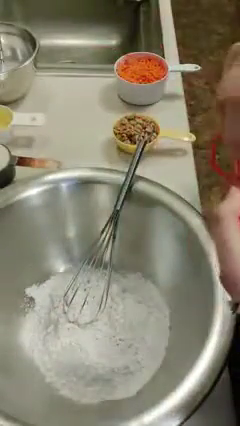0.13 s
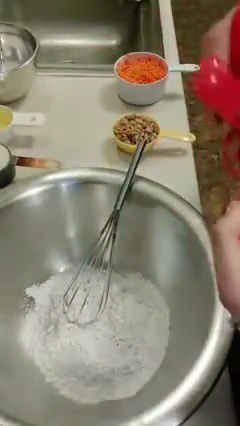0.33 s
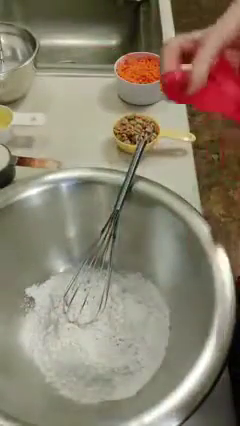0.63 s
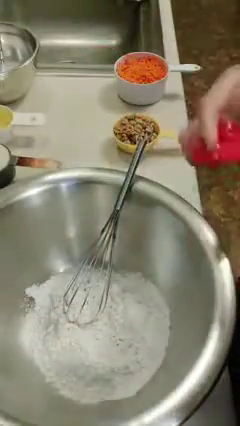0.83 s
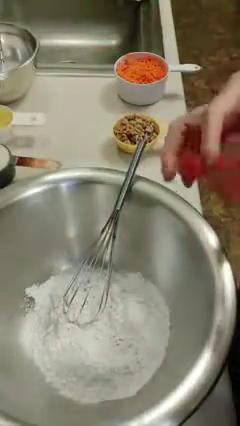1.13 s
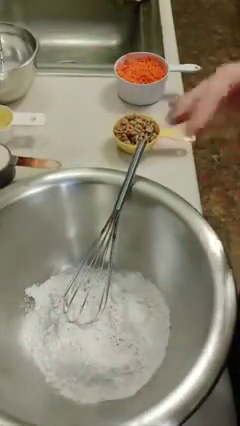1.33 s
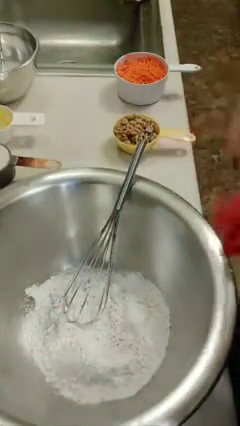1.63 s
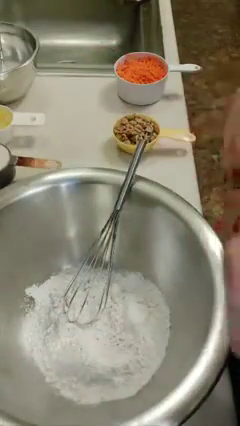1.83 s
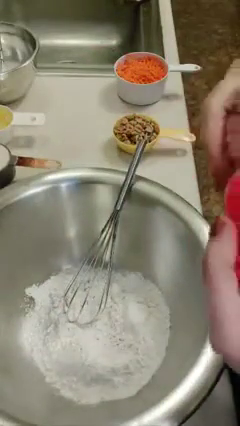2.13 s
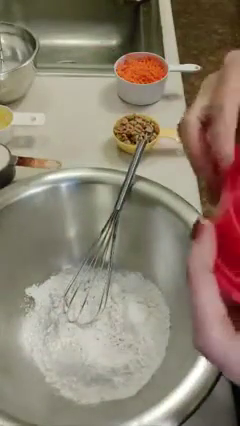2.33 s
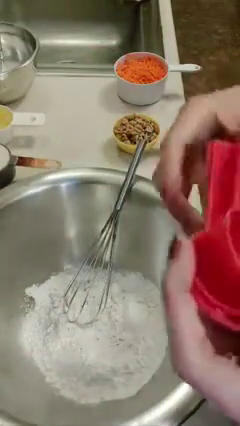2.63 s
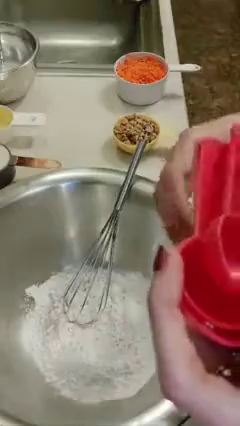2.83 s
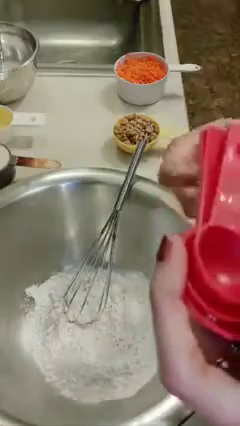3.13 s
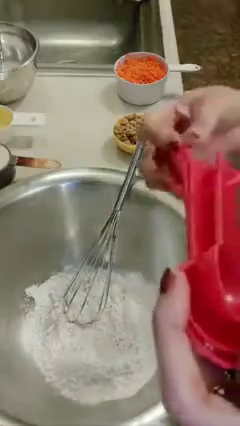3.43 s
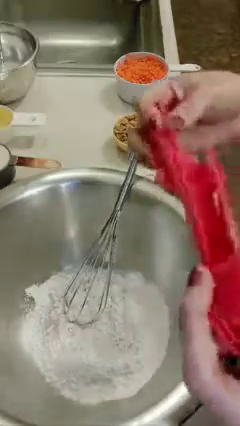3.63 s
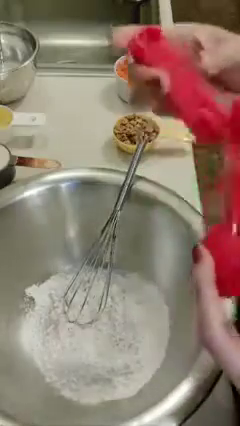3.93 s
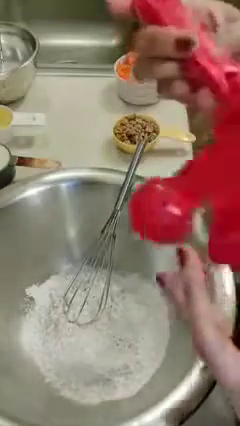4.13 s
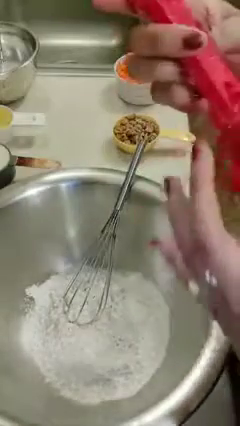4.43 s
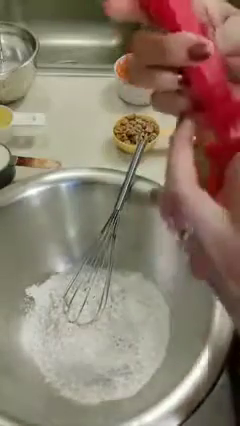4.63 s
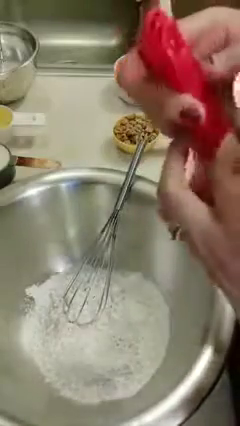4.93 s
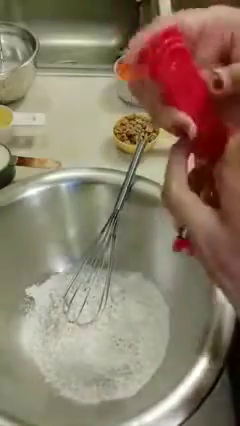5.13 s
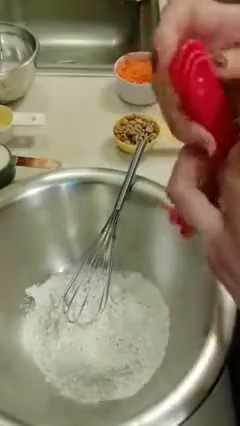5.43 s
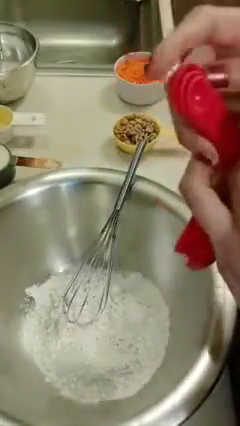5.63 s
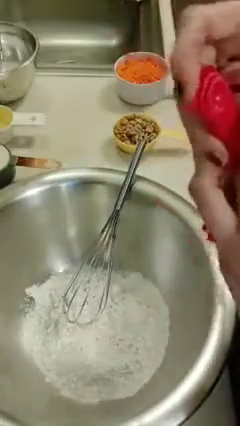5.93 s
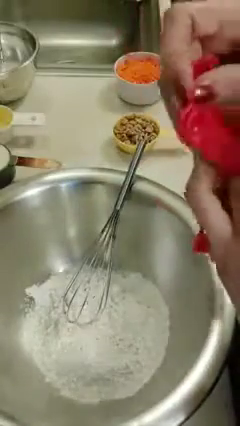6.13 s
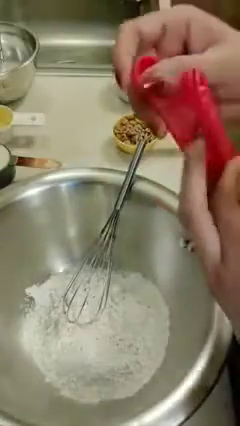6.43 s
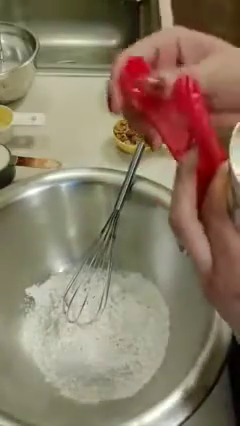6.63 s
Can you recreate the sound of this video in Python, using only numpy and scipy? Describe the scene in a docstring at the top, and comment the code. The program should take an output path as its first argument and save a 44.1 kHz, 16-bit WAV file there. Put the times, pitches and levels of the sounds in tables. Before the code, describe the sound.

A small kitchen with a quiet, steady refrigerator hum and soft low air, heard from close by. Right at the start, about 0.1 s, plastic measuring cups crack together loudly and brightly, followed by small clatters and scrapes until 0.6 s. Faint finger rubbing follows, then a light tock at 1.3 s and thin sliding. Around 1.75-1.8 s the cups land on the counter in a sharp, freer-ringing double clack. Only small ticks come until 3.0 s, when the gripped stack rattles in a tight, loud cluster, with further knocks at 3.3 and 3.6 s and short scrapes between. From 4.2 s loose spoons click and slide on their ring, with clearer clacks near 4.4, 4.7, 4.9 and 5.1 s. They thin to faint ticks and skin rubbing by 5.5-6 s, then sorted spoons clack again at 6.2-6.5 s. Knocks are dry, mostly leaning left, with a brief room tail.

```python
"""Plastic measuring cups and then a ring of plastic measuring spoons knock, clack and slide in the hands,
close to the microphone above a steel bowl. Each knock is a burst of tiny touches that sets decaying tones
ringing; sliding and fingertips send tiny slips or hiss through the same kind of tones.
A small kitchen rings briefly after them, a refrigerator hums in steady tones, and the air is shaped noise."""
import sys
import numpy as np
from scipy import signal
from scipy.fft import rfft, irfft, next_fast_len
from scipy.io import wavfile

SR = 44100
rng = np.random.default_rng(int(sys.argv[2]) if len(sys.argv) > 2 else 0)


def materialize(psi):
    """Save the field psi as 16-bit PCM at rate SR to the path in sys.argv[1].

    A 1-D psi becomes a single channel; in a 2-D psi each row is a channel.
    """
    bounded = np.clip(np.atleast_2d(psi).T, -1, 1)
    quanta = np.round(bounded * 32767).astype(np.int16)
    wavfile.write(sys.argv[1], SR, quanta)


N = 298998

# Refrigerator compressor, mains and fan tones: pitch_hz, level_db, left_over_right_db
REFRIGERATOR_TONES = [(46.9, -81, 16.5), (58.6, -78, 0.5), (67.3, -81.5, -2.5), (93.8, -69.5, -0.5),
                      (113, -68.5, -1), (119.7, -55.5, -2.5), (125.5, -69.5, 0), (351.4, -51, 17),
                      (494, -75, 7.5), (535, -80, -4), (586.6, -73, 1.5), (643, -87.5, 0.5),
                      (701, -74, -18)]
# Steady air noise, its balance over pitch: pitch_hz, density_db (relative, per Hz)
AIR_BALANCE = [(15, -44), (55, -8), (110, -11.5), (148, -0.5), (195, -16), (300, -8.5), (400, -16.5),
               (480, -17.5), (620, -22), (900, -33.5), (1500, -39.5), (2200, -47), (6000, -50),
               (11000, -53.5)]
# How alike the air noise is on both sides: pitch_hz, likeness (1 = the same)
AIR_LIKENESS = [(50, 1), (160, 0.93), (300, 0.9), (600, 0.68), (1500, 0.067), (8000, 0.078)]
# Side the air noise leans to: pitch_hz, left_over_right_db
AIR_LEAN = [(100, 2.5), (260, 2), (370, -2), (480, 3), (750, -2.5), (1200, 0.5)]
# Time the kitchen takes to fade by 60 dB: pitch_hz, fade_s
KITCHEN_FADE = [(800, 0.16), (2500, 0.29), (5500, 0.36), (10000, 0.28)]
# Strength of the kitchen's tail: pitch_hz, tail_db (relative to the sound sent into the room)
KITCHEN_STRENGTH = [(800, 6.5), (2500, -3.5), (5500, -5.5), (10000, -6.5)]
# Fingertips shifting their grip on the plastic: start_s, end_s, level_db
GRIPS = [(0.559, 0.894, -69.5), (1.126, 1.759, -79), (3.382, 4.21, -78.5), (4.153, 5.46, -75),
         (5.66, 5.878, -74.5)]
# Plastic sliding on plastic: start_s, end_s, level_db (relative), brightness_db_per_octave
SLIDES = [(0.084, 0.207, -55, -2), (0.376, 0.483, -51.5, -0.5), (0.512, 0.576, -63, 1.5),
          (1.143, 1.27, -76.5, 16.5), (1.259, 1.339, -53, -7.5), (1.411, 1.705, -59.5, -2),
          (1.707, 1.804, -51.5, 6), (2.024, 2.103, -66.5, 5.5), (2.46, 2.533, -73, -17.5),
          (2.69, 2.743, -60, -23.5), (2.935, 3.021, -59, 3.5), (3.041, 3.158, -56, 5),
          (3.233, 3.311, -56, -10), (3.35, 3.453, -57, -5), (3.453, 3.611, -65, 1.5),
          (3.642, 3.757, -62, -3), (3.784, 3.902, -61, -3), (4.148, 4.189, -65.5, -1.5),
          (4.201, 4.307, -61, -1), (4.294, 4.395, -56, -4.5), (4.452, 4.585, -72, 6),
          (4.628, 4.727, -60, -8), (4.762, 4.888, -54, -3), (4.937, 5.055, -68, 14),
          (5.221, 5.403, -61.5, 2), (6.358, 6.428, -57, -17.5)]
# Cups knocking together: start_s, level_db (relative), pitch_hz (strongest ring),
# focus_db_per_octave (low = broad crack, high = hollow tock), chatter_s, left_over_right_db
CUP_KNOCKS = [(0.0595, -38.5, 5800, 5.8, 0.0041, 3), (0.0722, -21.5, 5900, 11.5, 0.00053, 4),
              (0.0753, -20.5, 5800, 3.9, 0.0018, 15.5), (0.088, -31.5, 5800, 6.8, 0.0093, 6),
              (0.094, -44, 1290, 10.4, 0.003, -4.5), (0.109, -47, 5400, 6, .003, 5),
              (0.146, -44.5, 5400, 4.8, 0.0034, -5), (0.2323, -42, 5130, 6.5, 0.0025, 9),
              (0.396, -50.5, 4680, 1.7, 0.0016, 15), (0.406, -47, 4970, 4.4, 0.0027, 7),
              (0.423, -49.5, 4550, 4.9, .0024, 9), (0.452, -45.5, 3730, 9.5, 0.004, 10),
              (0.4705, -46.5, 4360, 12, 0.0016, 1), (0.532, -48.5, 3500, 14, 0.0015, 10),
              (0.5425, -48.5, 3980, 12, 0.0014, 20), (0.7755, -50, 5130, 13.4, 0.0018, 6.5),
              (1.2971, -38.5, 2980, 11, 0.00028, 5), (1.2995, -42, 4000, 21, 0.00077, 20),
              (1.4135, -41, 9800, 1.7, 0.0064, 6), (1.492, -48.5, 5120, 39, 0.0063, -4),
              (1.5687, -51, 3630, 30, 0.0043, 16.5), (1.605, -43.5, 3550, 16, 0.0026, 2.5),
              (1.6265, -54, 5800, 6.9, 0.0044, 11.5), (1.7293, -45.5, 8800, 29, 0.0027, 1),
              (1.7451, -26.5, 3770, 12.4, 0.00016, 19), (1.7462, -34.5, 3250, 9.2, 0.00029, 0.5),
              (1.7840, -24, 5170, 3.7, 0.0026, -1), (1.7905, -26, 4760, 2.8, 0.0028, 2),
              (1.802, -32, 5900, 9.6, 0.0026, -3.5), (1.811, -35.5, 5400, 12, 0.018, 2),
              (2.0214, -41.5, 5560, 12.5, 0.00061, 0), (2.5174, -50.5, 2937, 20, 0.00053, 7),
              (2.7186, -44, 3250, 18, 0.00071, 7), (2.9965, -47.5, 5160, 8, 0.008, 3),
              (3.0205, -23.5, 5300, 10.2, 0.0061, -4.5), (3.0305, -36, 3220, 13, .005, 3),
              (3.0355, -22, 5380, 9.8, 0.0036, 6), (3.041, -29.5, 5200, 4, 0.0033, -16),
              (3.0505, -28, 5150, 15, 0.0036, 8), (3.075, -43, 5040, 8.5, .004, -20),
              (3.092, -38, 5400, 7, 0.004, 1), (3.2487, -43.5, 3590, 18, 0.0049, 8),
              (3.275, -55.5, 4200, 15, 0.00085, 28), (3.3035, -50.5, 3300, 19, 0.0014, -18),
              (3.3368, -28, 5200, 12.4, 0.00092, 2), (3.3425, -36.5, 5530, 12, 0.0051, 11),
              (3.358, -59, 3430, 20, 0.008, -4), (3.6363, -33.5, 5240, 15, 0.0016, 8),
              (3.8685, -45, 3220, 11.5, 0.0029, 16), (3.9226, -51.5, 5000, 0.88, 0.0013, 8.5)]
# Spoons clacking on their ring: start_s, level_db (relative), pitch_hz, focus_db_per_octave,
# chatter_s, left_over_right_db
SPOON_KNOCKS = [(4.1838, -39.5, 3550, 9, 0.0047, 4), (4.2032, -46.5, 2820, 28, 0.0016, 2),
                (4.303, -50, 3170, 1.36, 0.03, 3), (4.4432, -36.5, 6150, 10.1, 0.0023, 8),
                (4.461, -47, 5950, 6.1, 0.005, 2), (4.6068, -41, 5830, 21.5, 0.0063, -1),
                (4.6241, -44.5, 5200, 3.3, 0.0041, 9.5), (4.687, -52.5, 3400, 6.2, 0.0016, 1),
                (4.7240, -36.5, 6500, 3, 0.0029, -1), (4.7305, -31.5, 6800, 6.7, 0.0016, -0.5),
                (4.738, -41, 5800, 7.4, 0.0027, -16), (4.7485, -47, 3200, 2.3, 0.001, 6),
                (4.9005, -31.5, 3240, 16.4, 0.0014, 1), (4.904, -38.5, 2800, 22, .003, -6),
                (4.9025, -41.5, 4700, 24, 0.005, 14), (4.99, -51.5, 5050, 3.9, 0.0032, 1),
                (5.0862, -34.5, 3220, 16.7, 0.0035, 3), (5.098, -38.5, 3370, 14.7, 0.0042, 7),
                (5.2195, -49.5, 6700, 3.8, 0.025, 8), (5.3066, -50.5, 5100, 13, 0.0087, 11),
                (5.326, -43, 3800, 11, 0.0037, 2.5), (5.38, -55.5, 4300, 4.8, 0.0019, 8),
                (5.4654, -46.5, 7800, 7.4, 0.0041, 5), (5.5005, -42, 8130, 6.2, 0.0038, 1),
                (5.7011, -56, 7700, 7.6, 0.0057, 1.5), (5.7592, -61.5, 5760, 10.3, 0.0025, 6),
                (5.9824, -59.5, 2560, 40, 0.0058, 6), (6.183, -52.5, 5180, 22, 0.0031, 9.5),
                (6.2005, -38.5, 5340, 9.3, 0.0039, 13), (6.2455, -44.5, 3060, 13, 0.003, -1),
                (6.2858, -38, 4170, 9.5, 0.0022, -2.5), (6.289, -45.5, 2640, 34, 0.0049, 4),
                (6.401, -63, 4970, 5.8, 0.0038, 6), (6.4475, -30.5, 5100, 11.7, 0.0061, 16),
                (6.4775, -37, 3160, 16, 0.0093, 6), (6.484, -46.5, 4800, 11, 0.0029, -8),
                (6.5342, -41.5, 3600, 16, 0.0012, -1)]
# The five tables below list the tones (modes) that ring at each contact: mostly the plastic's own, # but the
# narrow low tone among the dangling spoons is the steel bowl ringing along. # Columns: pitch_hz, width_hz
# (before extra damping; wider dies sooner), level_db (relative) # Hand-held cups
CUP_MODES = [(1290, 47, -11.5), (1750, 40, -22), (2350, 80, -10.5), (2880, 150, -11.5), (3300, 90, -6),
             (3650, 80, -7), (4000, 130, -1), (4510, 180, -3.5), (4892, 65, -4.5), (4870, 70, 2),
             (5400, 130, 1), (5760, 70, -3.5), (5960, 50, -1), (6700, 190, -7), (7550, 130, -2.5),
             (8400, 52, -5.5), (9060, 45, -1.5), (10040, 180, -14), (9540, 260, -14.5)]
# The whole stack of cups gripped in both hands: pitch_hz, width_hz, level_db
NESTED_MODES = [(1330, 120, -19.5), (1763, 55, -27.5), (2320, 160, -10.5), (3240, 41, -10.5),
                (3430, 183, 2.5), (4300, 150, -8.5), (4700, 150, -3), (5100, 250, -2.5), (5650, 260, -10.5),
                (6100, 60, -1), (6510, 230, -12), (7260, 130, -4), (8240, 70, -7.5), (8700, 80, -14.5),
                (9690, 95, -1), (10000, 150, -15)]
# The stack of cups let go on the counter, ringing freely: pitch_hz, width_hz, level_db
FREE_CUP_MODES = [(1629, 18, 6), (2168, 16, 5), (3253, 18, 8), (3400, 25, 3), (3800, 120, -12),
                  (4464, 18, 15), (5090, 60, 7), (5430, 55, 12), (5920, 60, 12.5), (6260, 25, 2.5),
                  (7000, 40, -1), (7570, 99, -2), (8110, 18, 10.5), (8950, 30, -4.5), (9460, 20, 8),
                  (9800, 70, -7)]
# Spoons dangling from their ring: pitch_hz, width_hz, level_db
SPOON_MODES = [(1112, 12, -1), (1414, 150, -8), (1704, 110, -7), (2073, 120, -6), (2563, 26, 6),
               (2750, 98, -2), (3157, 100, 4), (3600, 100, 7.5), (4370, 130, 2), (4960, 130, -2.5),
               (5300, 58, 5), (5800, 89, 5.5), (6400, 44, -3.5), (6800, 70, -3), (7220, 39, 1),
               (7980, 80, -7), (8670, 36, 4.5), (9160, 39, -10.5), (9340, 52, -6.5), (9500, 67, -5)]
# Spoons gathered in the fingers and sorted: pitch_hz, width_hz, level_db
SORTED_MODES = [(1120, 250, -11), (1940, 44, -20), (2130, 62, -9), (2560, 22, 3.5), (3070, 58, -2),
                (3250, 150, 6), (3970, 105, -3), (4410, 110, -0.5), (4970, 59, 9.5), (5600, 180, -4),
                (5600, 120, 6.5), (5890, 66, -19), (6170, 45, -15), (6940, 50, -14), (7400, 110, -13),
                (7880, 44, 0), (9850, 160, -17), (10070, 95, -12)]
# Edges of the low, body, bright and top bands: edge_hz
BAND_EDGES = [800, 2200, 4200, 6600, 12500]
# Time during which the cups stand free on the counter: start_s, end_s
CUPS_FREE_S = (1.76, 2.0)

NESTED_FROM_S, SPOONS_FROM_S, SORTED_FROM_S = 2.9, 4.0, 6.1
AIR_DB = -55
TOP_EDGE_HZ = 10900
GRIP_SWELL_DB = 4

# Fingers damp a held piece; its tones change a little at every contact
HELD_DAMPING_HZ, HELD_DETUNE, HELD_SCATTER_DB = 13, .003, 4.5
# Cups pressed together rub with duller tones; the loose spoons keep their notes better
RUB_DAMPING_HZ, RUB_DETUNE, RUB_SHIFTS_HZ = 80, 0.038, 18
LOOSE_DAMPING_HZ, LOOSE_DETUNE = 24, 0.0064

# The pieces graze just before they meet; the touches within a knock are uneven
GRAZE_S, GRAZE_SHARE, GRAZE_MAX_S = .0006, .35, .0017
TOUCH_SPREAD_DB = 1.5
# A focused knock has a stronger (dB per focus) and narrower main ring
CUP_RING_WIDTH_HZ, SPOON_RING_WIDTH_HZ = 1000, 800
RING_DB, RING_PER_FOCUS, RING_NARROWING = -9.5, 1, .05
# Sound sent all round is broader than sound sent straight to the microphone
SPREAD_FOCUS, SPREAD_RING_DB, SPREAD_DB = 0.94, -5, -1
# Knocks above this table level are near and stir the room relatively less
NEAR_DB, DRIER_DB_PER_DB = -34.5, 0.25

# Edges that catch during a slide; level relative to the slide's table level
CATCHES_PER_S, CATCH_DB, CATCH_SPREAD_DB = 32, -6, 3.5
CATCH_LOW_HZ, CATCH_HIGH_HZ, CATCH_CHATTER_S = 3000, 6400, .0009


def amp(db):
    """Turns decibels into a gain."""
    return 10 ** (np.asarray(db) / 20)


def evened(x):
    """Scales a sound to an average strength (rms) of 1."""
    return x / np.sqrt(np.mean(x ** 2) + 1e-20)


def read(points, hz):
    """Reads a table of pitch and value, with pitch on a logarithmic scale."""
    pitch_hz, value = np.transpose(points)
    return np.interp(np.log(hz + 1), np.log(pitch_hz + 1), value)


def add(mix, start_s, sound):
    """Mixes in a stereo sound from start_s onward."""
    part = mix[:, max(round(start_s * SR), 0):][:, :sound.shape[1]]
    part += sound[:, :part.shape[1]]


def panned(db):
    """Left and right gains with the same total power; positive leans left."""
    pair = amp(np.array([db, -db]) / 2)
    return pair / np.sqrt(np.mean(pair ** 2, axis=0))


def wander(hz, size):
    """Slow random movement of rms about 1: twelve sines at up to hz added together."""
    t = np.arange(0, size + 64, 64) / SR
    slow = 0
    for speed_hz in hz * rng.uniform(.1, 1, size=12):
        slow = slow + np.sin(2 * np.pi * (speed_hz * t + rng.random()))
    return np.interp(np.arange(size) / SR, t, slow / np.sqrt(6))


def coloured(x, band_db, size):
    """Sets the balance of four softly joined bands; rms 1 on each side over the first size samples."""
    length = next_fast_len(x.shape[1] + 256)
    hz = np.fft.rfftfreq(length, 1 / SR)
    spectrum = rfft(x, length)
    below = [1 / (1 + (hz / edge) ** 14) for edge in BAND_EDGES]
    out = 0
    for band, db in zip(np.diff(below, axis=0), band_db):
        part = irfft(spectrum * band, length)
        out = out + amp(db) * part / np.linalg.norm(part[:, :size])
    return out / np.sqrt(np.mean(out[:, :size] ** 2, axis=1, keepdims=True))


def refrigerator(waver_db=0.98, drift_turns=.03, spread_turns_per_hz=0.00057):
    """Steady tones that waver slightly; the higher ones are more out of step between the sides."""
    t = np.arange(N) / SR
    out = np.zeros((2, N))
    for hz, db, pan_db in REFRIGERATOR_TONES:
        turns = hz * t + rng.random() + drift_turns * wander(1.9, N)
        lag = np.array([[0], [spread_turns_per_hz * hz]])
        level = amp(db + waver_db * wander(4, N)) * panned(pan_db)[:, None]
        out += np.sqrt(2) * level * np.sin(2 * np.pi * (turns - lag))
    return out


def air():
    """Soft rush of the fan and the room: shaped noise, nearly the same on both sides in the bass."""
    hz = np.fft.rfftfreq(N, 1 / SR)
    left, other = rfft(rng.standard_normal((2, N)))
    same = np.clip(read(AIR_LIKENESS, hz), -1, 1)
    pair = np.array([left, same * left + np.sqrt(1 - same ** 2) * other])
    shape = amp(read(AIR_BALANCE, hz)) * panned(read(AIR_LEAN, hz))
    return amp(AIR_DB) * evened(irfft(pair * shape, N))


def kitchen(x, first_echo_s=0.0029, build_s=0.0004, cross=0.59):
    """Many scattered echoes make the room's tail; each pitch range fades at its own speed."""
    taps = rng.standard_normal((2, SR)) * (rng.random((2, SR)) < 4000 / SR)
    hz, t, z = signal.stft(taps, SR, nperseg=256)
    onset = 1 - np.exp(-np.maximum(t - first_echo_s, 0) / build_s)
    decay = onset * amp(-60 * t / read(KITCHEN_FADE, hz)[:, None])
    decay /= np.sqrt(np.mean(decay ** 2, axis=1, keepdims=True))
    decay *= amp(read(KITCHEN_STRENGTH, hz))[:, None]
    tail = signal.istft(z * decay, SR, nperseg=256)[1] / np.linalg.norm(taps[0])
    # the right side of the room also hears part of the left
    feed = np.array([x[0], cross * x[0] + (1 - cross) * x[1]])
    return signal.fftconvolve(feed, tail, axes=1)[:, :N]


def nearby(x, lag_s, near_db=-8, far_db=-3, fade_s=0.0023):
    """The right side hears a little later; hand, bowl and counter add quick echoes to both."""
    paths = np.zeros((2, 512))
    paths[0, 8] = 1
    paths[1, :40] = np.sinc(np.arange(40) - 8 - lag_s * SR)  # a delay by part of a sample
    for path, db in zip(paths, (near_db, far_db)):
        at = rng.integers(28, 512, size=18)
        echoes = rng.choice([-1, 1], len(at)) * np.exp(-at / SR / fade_s)
        path[at] += amp(db) * echoes / np.linalg.norm(echoes)
    return signal.fftconvolve(x[None], paths, axes=1)


def modes_at(s):
    """The pieces in the hand at time s: cups, the gripped stack, dangling spoons, gathered spoons."""
    holds = CUP_MODES, NESTED_MODES, SPOON_MODES, SORTED_MODES
    return holds[np.searchsorted([NESTED_FROM_S, SPOONS_FROM_S, SORTED_FROM_S], s)]


def body(modes, scatter_db, detune, damping_hz, snap_db=-23):
    """Answer to one contact: a dry snap, then fading tones that start in step, with dark gaps between."""
    t = np.arange(2048) / SR
    out = amp(snap_db) * (t == 0)
    for hz, width_hz, db in modes:
        decay = np.pi * (width_hz + damping_hz)
        weight = amp(db + scatter_db * rng.standard_normal()) * 2 * decay / SR
        shifted_hz = hz * (1 + detune * rng.standard_normal())
        tone = np.exp(-decay * t) * np.cos(2 * np.pi * shifted_hz * t)
        out = out + weight * tone * np.heaviside(t, .5)  # half weight on the first sample
    return out


def struck(s, free_damping_hz=22, free_snap_db=-16):
    """Cups let go on the counter always ring on the same notes; held pieces vary at every contact."""
    if CUPS_FREE_S[0] < s < CUPS_FREE_S[1]:
        return body(FREE_CUP_MODES, 0, 0, free_damping_hz, snap_db=free_snap_db)
    return body(modes_at(s), HELD_SCATTER_DB, HELD_DETUNE, HELD_DAMPING_HZ)


def rubbed(force, s, count=5):
    """The contact travels between a few places on the plastic, each with its own ringing tones."""
    detune, damping_hz = RUB_DETUNE, RUB_DAMPING_HZ
    if s >= SPOONS_FROM_S:
        detune, damping_hz = LOOSE_DETUNE, LOOSE_DAMPING_HZ
    sound = 0
    for _ in range(count):
        push = force * wander(RUB_SHIFTS_HZ, len(force))
        place = body(modes_at(s), HELD_SCATTER_DB, detune, damping_hz, snap_db=-14)
        sound = sound + signal.fftconvolve(push, place)
    return nearby(sound, lag_s=0.00013)


def fingers(low_db=-10, body_db=-1, top_db=-3, pan_db=4):
    """Dry skin brushes the plastic: a fine hiss that swells and sinks with the grip."""
    out = np.zeros((2, N))
    for start, end, db in GRIPS:
        size = round((end - start) * SR)
        swell = amp(GRIP_SWELL_DB * wander(29.6, size)) * signal.windows.tukey(size, .3)
        brush = rng.standard_normal(size) * swell
        sound = coloured(rubbed(brush, start), (low_db, body_db, 0, top_db), size=size)
        add(out, start, amp(db) * panned(pan_db)[:, None] * sound)
    return out


def slides(slips_per_s=1200, pressure_db=0.5, cup_low_db=-15, spoon_low_db=-5, body_db=3.0,
           top_db=-4.0, pan_db=4, level_db=-2.0):
    """Tiny slips, a few of them crisp, under uneven hand pressure set the plastic ringing."""
    out = np.zeros((2, N))
    for start, end, db, brightness in SLIDES:
        size = max(round((end - start) * SR), 400)
        slips = rng.choice([-1, 1], size) * (rng.random(size) < slips_per_s / SR)
        slip_db = 4.5 * np.minimum(rng.exponential(1, size), 3.5)
        pressure = amp(slip_db + pressure_db * wander(61.0, size))
        slips = slips * pressure * signal.windows.tukey(size, .3)
        # the long spoon handles sound lower than the cups
        low_db = cup_low_db if start < SPOONS_FROM_S else spoon_low_db
        tilt_db = brightness * np.log2(BAND_EDGES[3] / BAND_EDGES[2])
        band_db = (low_db, body_db - tilt_db, 0, top_db + tilt_db)
        sound = coloured(rubbed(slips, start), band_db, size=size)
        add(out, start, amp(db + level_db) * panned(pan_db)[:, None] * sound)
    return out


def catches(focus=10, pitch_per_brightness=0.028, pan_db=2.5, pan_spread_db=3):
    """Edges catch at random moments of a slide and make small ticks, higher in a brighter slide."""
    rows = []
    for start, end, db, brightness in SLIDES:
        for _ in range(int((end - start) * CATCHES_PER_S)):
            when = start + rng.random() * (end - start)
            place = rng.random() + pitch_per_brightness * brightness
            pitch_hz = CATCH_LOW_HZ * (CATCH_HIGH_HZ / CATCH_LOW_HZ) ** place
            tick_db = db + CATCH_SPREAD_DB * rng.standard_normal()
            side_db = pan_db + pan_spread_db * rng.standard_normal()
            rows.append((when, tick_db, pitch_hz, focus, CATCH_CHATTER_S, side_db))
    return knocks(rows, ring_width_hz=140, chatter_db=7.5, low_db=-10.0, lag_s=0.00012, level_db=CATCH_DB)


def knock_colour(pitch_hz, focus, low_db):
    """Band levels fall away on both sides of the pitch; small pieces give off little bass."""
    centres = np.sqrt(np.multiply(BAND_EDGES[:-1], BAND_EDGES[1:]))
    return -focus * abs(np.log2(centres / pitch_hz)) + low_db * (centres < BAND_EDGES[1])


def knock_force(since, chatter_s, chatter_db, touches_per_s=2500):
    """Scattered touches swell as the pieces graze and die away as they chatter, around one main hit."""
    size = len(since)
    touches = rng.standard_normal(size) * (rng.random(size) < touches_per_s / SR)
    touches *= amp(TOUCH_SPREAD_DB * (np.minimum(rng.exponential(1, size), 3) + 1.0))
    graze_s = np.clip(GRAZE_S + GRAZE_SHARE * chatter_s, 1e-4, GRAZE_MAX_S)
    grazing = .5 * np.exp(-abs(since) / graze_s)
    chattering = np.exp(-abs(since) / max(chatter_s, 1e-4))
    force = amp(chatter_db) * touches * np.where(since < 0, grazing, chattering)
    force[since == 0] = 1
    return force


def knocks(rows, ring_width_hz, chatter_db, low_db, lag_s, level_db=0):
    """The pieces meet and one ring stands out; returns the direct sound and what goes into the room."""
    direct, spread = np.zeros((2, N)), np.zeros((2, N))
    lead = 256  # samples of grazing before the main hit
    t = np.arange(2048) / SR
    since = (np.arange(2048) - lead) / SR
    for s, db, pitch_hz, focus, chatter_s, pan_db in rows:
        force = knock_force(since, chatter_s, chatter_db)
        piece = evened(signal.fftconvolve(force, struck(s)))
        # a hollow tock rings longer and purer than a broad crack
        width_hz = ring_width_hz * np.exp(-RING_NARROWING * focus)
        ring = np.exp(-np.pi * width_hz * t) * np.sin(2 * np.pi * pitch_hz * t)
        ring = evened(signal.fftconvolve(piece, ring)[:len(piece)])
        ring *= amp(RING_DB + RING_PER_FOCUS * focus)
        beam_colour = knock_colour(pitch_hz, focus, low_db)
        beamed = coloured(nearby(piece + ring, lag_s), beam_colour, size=880)
        round_colour = knock_colour(pitch_hz, SPREAD_FOCUS * focus, low_db)
        around = coloured((piece + amp(SPREAD_RING_DB) * ring)[None], round_colour, size=880)
        gain = amp(db + level_db) * panned(pan_db)[:, None]
        room_gain = amp(SPREAD_DB - DRIER_DB_PER_DB * max(db - NEAR_DB, 0))
        add(direct, s - lead / SR, gain * beamed)
        add(spread, s - lead / SR, gain * room_gain * around)
    return np.array([direct, spread])


def cup_knocks():
    """Cups knock together with a broad, quickly damped main ring and little bass."""
    return knocks(CUP_KNOCKS, CUP_RING_WIDTH_HZ, chatter_db=1.0, low_db=-11, lag_s=0.00014, level_db=-6.0)


def spoon_knocks():
    """Spoons clack on their ring with weaker chatter and more bass than the cups."""
    return knocks(SPOON_KNOCKS, SPOON_RING_WIDTH_HZ, chatter_db=-6.5, low_db=-2, lag_s=.00009,
                  level_db=-2.5)


def scene():
    """Cups and spoons in the kitchen, over the hum and the air."""
    background = refrigerator() + air()
    rubbing = slides() + fingers()
    direct, spread = cup_knocks() + spoon_knocks() + catches()
    return direct + rubbing + kitchen(spread + rubbing) + background


def record(dry):
    """A low-pass filter takes away the treble above the top edge."""
    lowpass = signal.firwin(161, TOP_EDGE_HZ, window=("kaiser", 8), fs=SR)
    return signal.oaconvolve(dry, lowpass[None], "same")


dry = scene()
out = record(dry)
materialize(out)
```